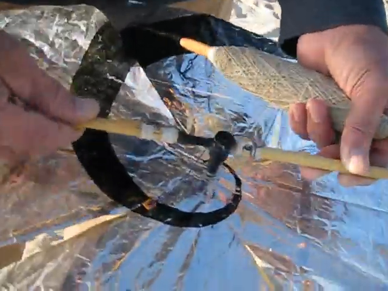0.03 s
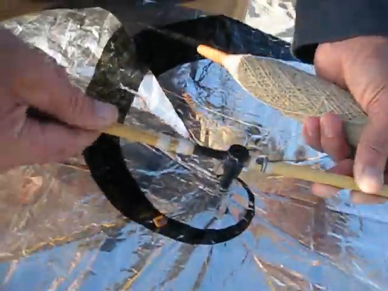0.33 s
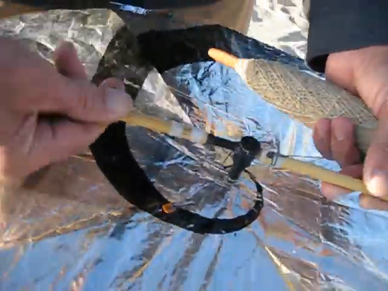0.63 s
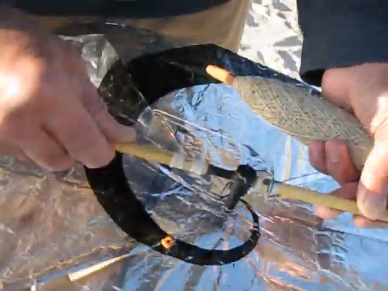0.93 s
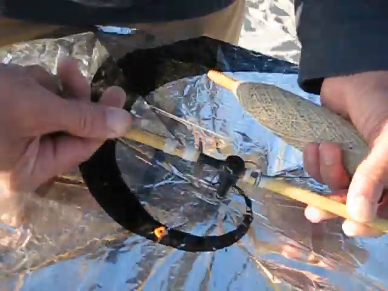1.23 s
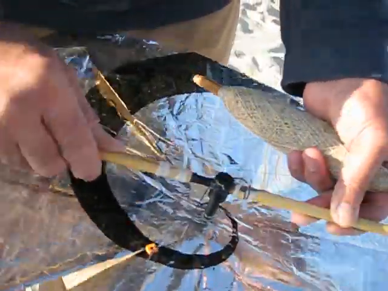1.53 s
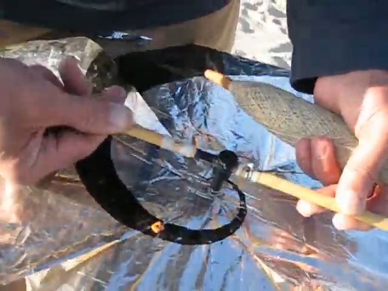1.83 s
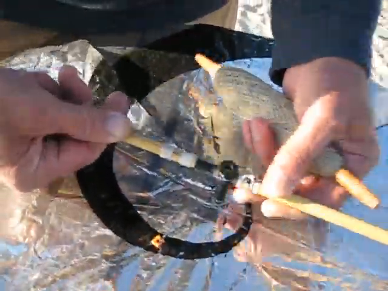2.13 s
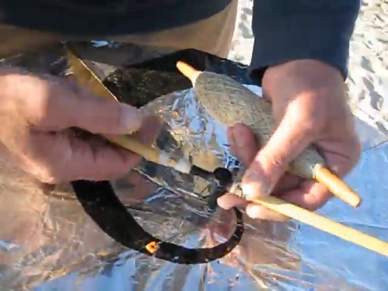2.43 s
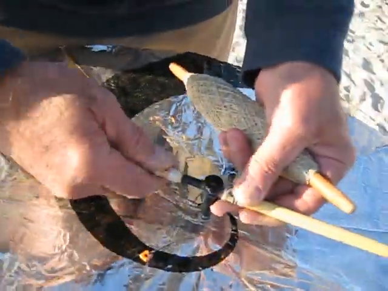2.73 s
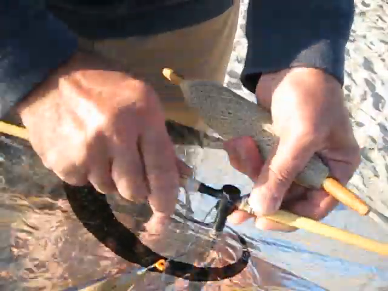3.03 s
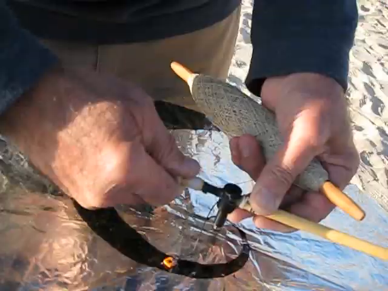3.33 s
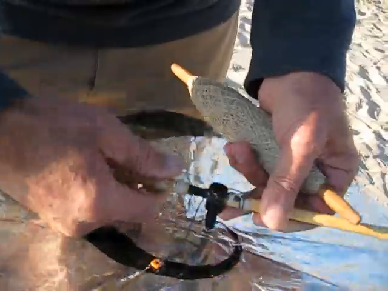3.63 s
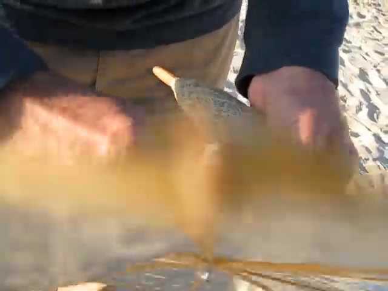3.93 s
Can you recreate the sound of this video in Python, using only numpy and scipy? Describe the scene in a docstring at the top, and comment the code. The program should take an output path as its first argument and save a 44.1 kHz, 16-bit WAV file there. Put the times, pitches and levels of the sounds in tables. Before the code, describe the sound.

Wind buffets a close microphone outdoors over a steady airy wash. The gusts are lighter at first, hit hard from about 1.8 to 2.5 seconds, ease briefly, then return with a low rumble from 3 to 4 seconds. A foil kite rustles and crinkles softly throughout. A thin rod ticks around 0.2 seconds, knocks faintly a few times until 1.5 seconds, and snaps once near 2.5 seconds.

```python
"""Assembling a kite in the wind

Hands fit thin rods into the joint of a foil kite on a windy beach, close to a small camera.
Turbulent gusts buffet the microphone's port and push its limiter down. The foil rustles and pops
as it creases; a rod ticks by stick-slip friction, knocks on the joint and snaps once against its
fitting. Behind them lies an even wash of wind on the sand, which fades at the end."""
import sys
import numpy as np
from scipy import signal
from scipy.fft import rfft, irfft, next_fast_len
from scipy.io import wavfile
from scipy.ndimage import uniform_filter1d, minimum_filter1d, map_coordinates

SR = 44100
rng = np.random.default_rng(int(sys.argv[2]) if len(sys.argv) > 2 else 0)


def wrap_up_sound(samples):
    """Save the sound to the file named by the first command line argument, as 16-bit audio."""
    columns = np.atleast_2d(samples).T
    # keep every value between -1 and 1, then stretch to whole-number steps
    tamed = np.clip(columns, -1, 1)
    steps = np.round(tamed * 32767).astype(np.int16)
    wavfile.write(sys.argv[1], SR, steps)


N = 176400

# gusts on the microphone: centre t/s, rise time/s, level/dB, corner f/Hz
PORT_GUSTS = [(0.049, 0.013, -21.5, 370), (0.121, 0.016, -20, 566), (0.159, 0.0095, -12, 425),
              (0.2, 0.0063, -21.5, 381), (0.393, 0.016, -15.5, 522.3), (0.434, 0.012, -24, 480),
              (0.659, 0.02, -18, 335.6), (0.959, 0.024, -25.5, 320), (1.29, 0.03, -28.5, 333),
              (1.405, 0.0084, -14, 423.6), (1.494, 0.018, -18, 495), (1.539, 0.0079, -14.5, 655),
              (1.573, 0.012, -24.5, 405), (1.803, 0.013, -15.5, 362), (1.897, 0.0079, -9, 894),
              (1.942, 0.013, -13, 1013), (1.977, 0.0072, -15, 649), (2.004, 0.0087, -4, 965),
              (2.029, 0.0084, -8, 1012), (2.058, 0.013, -9, 711), (2.11, 0.017, -25.5, 293),
              (2.205, .012, -3, 780), (2.273, 0.019, -16.5, 475), (2.319, 0.011, -15.5, 374.6),
              (2.41, 0.014, -4.5, 738), (2.453, 0.024, -6.5, 598), (2.523, 0.0073, -18.5, 530),
              (2.605, 0.061, -27, 323), (2.691, 0.01, -12.5, 475), (2.938, 0.013, -22, 392),
              (3.002, 0.018, -13.5, 444), (3.08, 0.016, -16, 327), (3.128, 0.017, -16, 520),
              (3.208, 0.02, -12.5, 452), (3.268, 0.015, -13, 327), (3.337, 0.0086, -10, 554),
              (3.396, 0.0075, -9.5, 436), (3.429, 0.014, -17.5, 410), (3.462, 0.012, -4.5, 626.5),
              (3.592, 0.014, -8.5, 578), (3.625, 0.0084, -2, 817), (3.676, 0.016, -3, 610.6),
              (3.746, 0.0053, -11, 401), (3.812, 0.014, -13.5, 338), (3.862, 0.016, -7.5, 725),
              (3.955, 0.041, -20, 409)]
# single eddies that slap the port: t/s, level/dB, f/Hz
EDDY_SLAPS = [(.158, -7.5, 416), (0.175, 2.5, 257), (0.382, -5, 400), (.392, 1.5, 560), (.663, -10, 230),
              (1.539, -3, 700), (1.827, -6, 330), (1.849, -4.5, 153), (1.877, -1, 300), (1.946, 2.5, 950),
              (2.0, 11, 657), (2.203, 6, 590), (2.269, -4.5, 606), (2.313, 2, 213), (2.397, 10, 770),
              (2.986, 2.5, 373), (2.995, -7, 230), (3.096, 3, 225), (3.103, 8.5, 534), (3.195, 5, 620),
              (3.303, 0.5, 358), (3.333, -2, 480), (3.389, -3.5, 320), (3.455, -0.5, 614),
              (3.535, 0.5, 250), (3.581, 8, 340), (3.75, 1, 380), (3.789, 4, 520), (3.835, -5, 850),
              (3.887, -4, 472), (3.927, 0, 325)]
# envelope of the foil's rustle: t/s, level/dB
RUSTLE_ENVELOPE = [(0, -46), (.14, -42.5), (.28, -45), (.52, -45.5), (.6, -41.5), (.74, -38), (.85, -47.5),
                   (.94, -41.5), (1.1, -46), (1.18, -38), (1.385, -33.5), (1.42, -39.5), (1.66, -43.5),
                   (1.88, -33.5), (2.1, -41.5), (2.3, -43), (2.42, -53.5), (2.62, -50), (2.85, -51),
                   (2.97, -46.5), (3.25, -41), (3.36, -50.5), (3.5, -46.5), (3.77, -43.5), (4, -54)]
# spectrum of the rustle: f/Hz, relative level/dB
RUSTLE_SPECTRUM = [(200, -28), (1000, -2), (2200, -2), (4200, -1), (5000, -3.5), (6500, -1), (8800, -9),
                   (10400, -6), (12500, -11.5), (16000, -33)]
# creases that pop: t/s, relative level/dB, centre f/Hz
CREASE_POPS = [(0.022, -28.5, 3740), (0.034, -30, 4080), (0.118, -22.5, 2430), (0.124, -24, 6000),
               (.351, -21, 3600), (0.645, -30, 3970), (0.694, -31, 3500), (0.94, -25.5, 5550),
               (1.163, -26, 4550), (1.176, -28, 4000), (1.728, -20.5, 3170), (1.779, -21.5, 4260),
               (2.295, -28, 3200), (2.301, -27, 3340), (2.951, -40, 12000), (3.277, -23.5, 2660),
               (3.73, -29, 3380), (3.757, -32.5, 12000)]
# slips of a rod in its sleeve: t/s, level/dB
ROD_SLIPS = [(.103, -29), (.157, -23), (.184, -24), (.193, -28), (.2, -33), (0.208, -36), (.219, -21.5),
             (0.23, -19), (.244, -26.5)]
# spectrum of a rod's slips and of its snap's crack: f/Hz, relative level/dB
ROD_SPECTRUM = [(500, -22), (2500, 0), (4000, -8), (5500, -7), (7000, 3), (10000, -8), (13000, 1.5),
                (16000, -29)]
# knocks of a rod on the joint: t/s, level/dB
ROD_KNOCKS = [(.351, -20), (0.876, -23.5), (1.448, -22)]
# modes rung by the snap: f/Hz, relative level/dB, T60/s
ROD_MODES = [(4550, -12, 0.0083), (5420, 5, 0.012), (6080, 6, 0.013), (8700, -4, 0.0067),
             (12000, -12, 0.0092)]
# envelope of the rumble on the port: t/s, level/dB
RUMBLE_ENVELOPE = [(0, -40.5), (.35, -34.5), (.55, -35.5), (.8, -42), (1.2, -39.5), (1.5, -27.5),
                   (1.7, -39.5), (1.85, -26.5), (2.12, -30), (2.3, -23), (2.55, -26.5), (2.86, -41.5),
                   (3.1, -23), (4, -24)]
# spectrum of the rumble: f/Hz, relative level/dB
RUMBLE_SPECTRUM = [(20, -32), (60, -7), (140, -1), (190, -3.5), (260, -7.5), (450, -21), (1200, -59),
                   (4000, -100)]
# envelope of the wind over the beach: t/s, level/dB
WASH_ENVELOPE = [(0, -38), (2.9, -38.5), (3.8, -42), (4, -50)]
# spectrum of that wind: f/Hz, relative level/dB
WASH_SPECTRUM = [(30, 9.5), (200, -8.5), (450, 4.5), (850, 5.5), (1400, 4), (1750, 0.5), (2050, 2),
                 (3000, 0.5), (5000, -8.5), (7000, -19), (10500, -15), (13000, -20.5), (16000, -28)]


def gusts():
    """Turbulence: each gust is a swell of eddies at the port; faster air reaches higher frequencies."""
    steepness, fall_over_rise = 1.666, 1.12
    bass_hz, bass_order, treble_order = 99, 0.35, 3.66
    lump_db, lumps_per_cycle = 11, .35  # single eddies stand out, more often in a faster gust
    out, t = np.zeros(N), np.arange(-SR // 8, SR // 8) / SR
    window = np.hanning(2 * int(.018 * SR))
    for s, rise_s, db, corner_hz in PORT_GUSTS:
        width_s = rise_s * np.where(t < 0, 1, fall_over_rise)
        swell = np.exp(steepness * (1 - np.hypot(1, t / width_s)))
        lumps = amp(lump_db * np.tanh(wobble(lumps_per_cycle * corner_hz, len(t))))
        highpass = lambda hz: (hz / np.hypot(hz, bass_hz)) ** bass_order
        band = lambda hz: highpass(hz) / np.hypot(1, (hz / corner_hz) ** treble_order)
        eddies = filtered(rng.standard_normal(len(t)) * lumps, band)
        local_power = np.abs(signal.fftconvolve(eddies ** 2, window, "same")) + 1e-12
        gust = unit(swell * eddies / np.sqrt(local_power))  # neighbouring eddies share the energy
        add(out, s + t[0], amp(db) * gust * np.sqrt(np.mean(swell ** 2)))
    return out


def slaps():
    """Convected pressure: a compact eddy crosses the port as one swing with a short rebound."""
    rise_cycles, fall_cycles = 0.15, 0.235
    out, t = np.zeros(N), np.arange(-SR // 50, SR // 50) / SR
    for s, db, hz in EDDY_SLAPS:
        cycles = hz * t
        envelope = np.exp(1 - np.hypot(1, cycles / np.where(t < 0, rise_cycles, fall_cycles)))
        add(out, s + t[0], amp(db) * envelope * np.sin(2 * np.pi * (cycles + rng.random())))
    return out


def foil_rustle():
    """Superposition: tiny crinkles add in power to a sliding hiss, with sparse crisp ticks on top."""
    crinkles_per_s, crinkle_share, ticks_per_s, tick_hz = 620, 0.77, 60, 8500
    tick_db, flutter_db = -17, 1.7
    onsets = rng.random(N) < crinkles_per_s / SR
    crinkles = onsets * amp(np.minimum(rng.standard_normal(N), 2))  # sizes spread by about 1 dB
    fade = decay(np.arange(SR // 50) / SR, t60=0.011)
    power = np.abs(signal.fftconvolve(crinkles ** 2, fade ** 2)[:N])
    grain = np.sqrt(crinkle_share * power / power.mean() + 1 - crinkle_share) * rng.standard_normal(N)
    impulses = (rng.random(N) < ticks_per_s / SR) * rng.standard_normal(N)
    ticks = unit(filtered(impulses, octave_band(tick_hz, sigma_octaves=0.5)))
    rustle = unit(filtered(grain, colour(RUSTLE_SPECTRUM))) + amp(tick_db) * ticks
    return rustle * amp(curve(RUSTLE_ENVELOPE) + flutter_db * wobble(45, N))


def foil_creases():
    """Buckling: a crease gives way gradually, so its pop has a soft onset; its top is dull."""
    rise_s, top_hz = 0.0013, 11800
    out = np.zeros(N)
    for s, db, centre_hz in CREASE_POPS:
        band = octave_band(centre_hz, sigma_octaves=0.82)
        pop = burst(lambda hz: band(hz) / np.hypot(1, (hz / top_hz) ** 6), t60=0.017)
        onset = 1 - np.exp(-np.arange(len(pop)) / SR / rise_s)
        add(out, s, 2 * amp(db) * onset * pop)
    return out


def rod_slips():
    """Stick-slip friction: a rod ticks each time it breaks free in its sleeve."""
    out = np.zeros(N)
    for s, db in ROD_SLIPS:
        add(out, s, amp(db) * burst(colour(ROD_SPECTRUM), t60=0.0074))
    return out


def rod_knocks():
    """Damped resonance: a rod strikes the joint with a small woody ring."""
    centre_hz, bandwidth_hz = 2070, 340
    resonance = lambda hz: 1 / np.hypot(1, 2 * (hz - centre_hz) / bandwidth_hz)
    out = np.zeros(N)
    for s, db in ROD_KNOCKS:
        add(out, s, amp(db) * burst(resonance, t60=0.028))
    return out


def rod_snap():
    """Impact excitation: a rod hits its fitting with a crack, and its modes ring briefly."""
    out, t = np.zeros(N), np.arange(SR // 20) / SR
    ring = sum(amp(db) * decay(t, t60) * np.sin(2 * np.pi * (hz * t + rng.random()))
               for hz, db, t60 in ROD_MODES)
    crack = amp(1.5) * burst(colour(ROD_SPECTRUM), t60=0.016)
    add(out, s=2.4567, sound=amp(-7.5) * (ring + crack))
    return out


def port_rumble():
    """Flow noise: air passing the port keeps up a low, swaying rumble between the gusts."""
    sway_db = 2.5
    rumble = noise(colour(RUMBLE_SPECTRUM), N)
    return rumble * amp(curve(RUMBLE_ENVELOPE) + sway_db * wobble(24, N))


def beach_wash():
    """Aerodynamic noise: wind over the sand makes an even broadband wash."""
    return noise(colour(WASH_SPECTRUM), N) * amp(curve(WASH_ENVELOPE))


def amp(db):
    """Amplitude ratio of a level in decibels."""
    return 10 ** (np.asarray(db) / 20)


def unit(x):
    """Normalisation to rms 1."""
    return x / np.sqrt(np.mean(x ** 2) + 1e-20)


def decay(t, t60):
    """Exponential damping by 60 dB in t60 seconds."""
    return np.exp(-np.log(1000) * t / t60)


def curve(rows):
    """Linear interpolation of (t/s, level/dB) rows, one level a sample."""
    return np.interp(np.arange(N) / SR, *np.transpose(rows))


def colour(points):
    """Frequency response through (f/Hz, level/dB) points on a log axis."""
    f, db = np.transpose(points)
    return lambda hz: amp(np.interp(np.log(hz + 1), np.log(f), db))


def octave_band(centre_hz, sigma_octaves):
    """Gaussian response in log frequency."""
    return lambda hz: np.exp(-.5 * (np.log2((hz + 1) / centre_hz) / sigma_octaves) ** 2)


def filtered(x, response):
    """Linear filtering: the spectrum of x times a frequency response."""
    size = next_fast_len(len(x) + 4096)
    return irfft(rfft(x, size) * response(np.fft.rfftfreq(size, 1 / SR)), size)[:len(x)]


def noise(response, size):
    """Spectrally shaped noise of rms 1."""
    return unit(filtered(rng.standard_normal(size), response))


def burst(response, t60):
    """A damped transient of shaped noise."""
    t = np.arange(SR // 20) / SR
    return noise(response, len(t)) * decay(t, t60)


def wobble(knots_per_s, size):
    """Random modulation: a smooth curve through Gaussian knots."""
    return map_coordinates(rng.standard_normal(2048), [np.arange(size) * knots_per_s / SR], mode="wrap")


def add(track, s, sound):
    """Superposition of a sound on the track from time s."""
    start = round(s * SR)
    part = sound[max(-start, 0):max(N - start, 0)]
    track[max(start, 0):][:len(part)] += part


def scene():
    """Superposition: the pressures of all sources add at one microphone."""
    wind = gusts() + slaps() + port_rumble() + beach_wash()
    kite = foil_rustle() + foil_creases() + rod_slips() + rod_knocks() + rod_snap()
    return (wind + kite)[None]


def limiter(x):
    """Peak limiting: the gain drops on a peak and creeps back, ducking the rustle under strong gusts."""
    ceiling, release_db_per_s, smoothing_samples = .7, 101, 65
    excess_db = 20 * np.log10(np.maximum(np.abs(x) / ceiling, 1))
    release_db = release_db_per_s * np.arange(N) / SR
    gain = amp(release_db - np.maximum.accumulate(excess_db + release_db))
    held_gain = minimum_filter1d(gain, smoothing_samples)
    return x * uniform_filter1d(held_gain, smoothing_samples)


def record(dry):
    """Cavity antiresonance: the port's hollow cuts a notch; the camera then limits peaks and bandwidth."""
    notch_hz, half_width_hz, depth, top_hz = 7870, 520, 0.86, 15850
    port = lambda hz: 1 - depth / (1 + ((hz - notch_hz) / half_width_hz) ** 2)
    limited = limiter(filtered(dry[0], port))
    return filtered(limited, lambda hz: hz < top_hz)[None]


dry = scene()
out = record(dry)
wrap_up_sound(out)
```